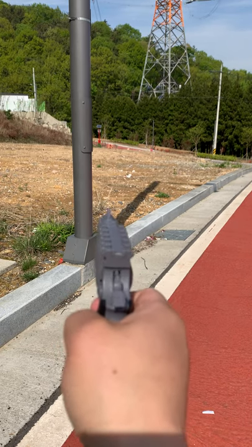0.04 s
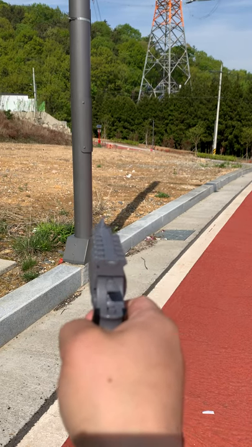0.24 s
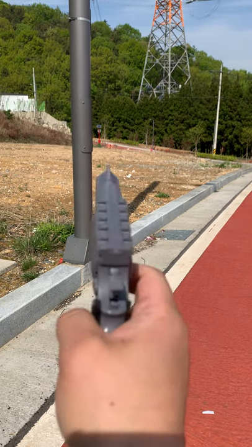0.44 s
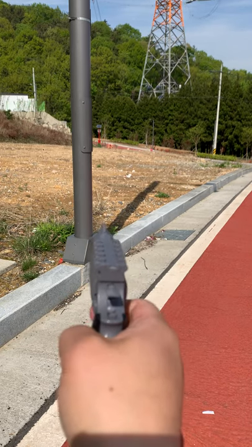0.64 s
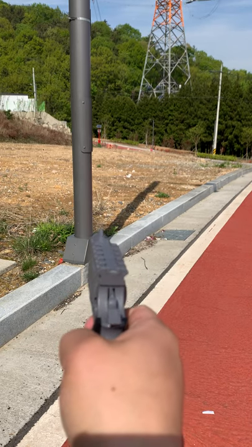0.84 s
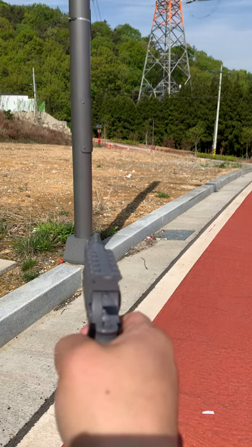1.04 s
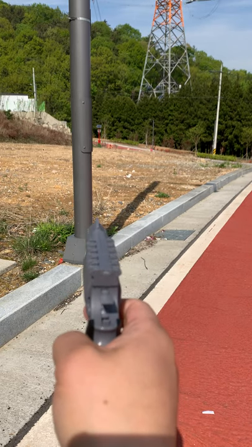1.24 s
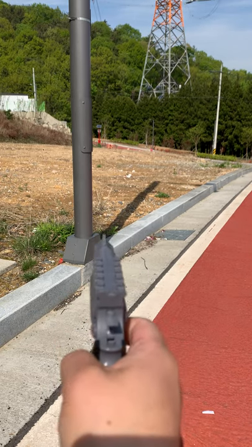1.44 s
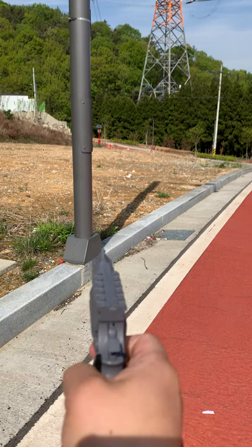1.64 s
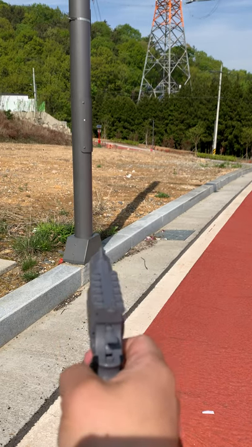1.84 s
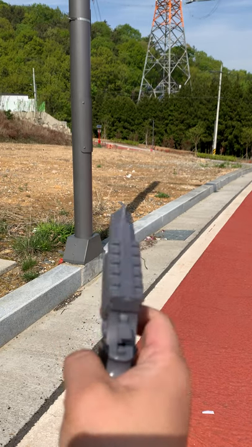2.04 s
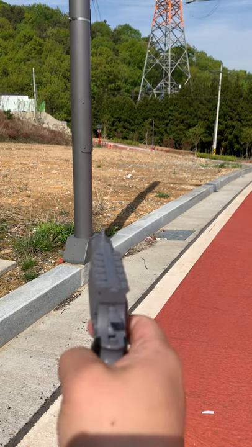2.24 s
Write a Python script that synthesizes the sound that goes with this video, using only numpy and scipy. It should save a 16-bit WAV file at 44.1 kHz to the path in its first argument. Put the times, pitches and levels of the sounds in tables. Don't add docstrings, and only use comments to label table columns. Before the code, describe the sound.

Three sharp snaps of a spring-powered toy gun outdoors, ratcheting clicks and pellet rattle in between

```python
import sys
import numpy as np
from scipy import signal
from scipy.fft import rfft, irfft
from scipy.io import wavfile
from scipy.ndimage import uniform_filter1d

SR = 44100
rng = np.random.default_rng(int(sys.argv[2]) if len(sys.argv) > 2 else 0)


def gain_from_db(level_db):
    decades = np.asarray(level_db, float) / 20
    return 10 ** decades


def put_to_file(sound):
    columns = np.atleast_2d(sound).T
    safe = np.clip(columns, -1, 1)
    whole_steps = np.round(safe * 32767)
    wavfile.write(sys.argv[1], SR, whole_steps.astype(np.int16))


N = 101430
T = np.arange(N) / SR


def unit(x):
    return x / np.sqrt(np.mean(x ** 2))


def colour(x, table):
    size = 2 ** 15
    hz, db = np.array(table, float).T
    bin_hz = np.arange(size // 2 + 1) * SR / size
    log_gain = np.interp(np.log(bin_hz + 1), np.log(hz), db) * np.log(10) / 20
    cepstrum = irfft(log_gain)
    cepstrum[1:size // 2] *= 2
    cepstrum[size // 2 + 1:] = 0
    impulse = irfft(np.exp(rfft(cepstrum)))[:size // 2]
    return signal.fftconvolve(x, impulse / np.sqrt(np.sum(impulse ** 2)))[:len(x)]


def ring(x, hz, t60_s):
    r = np.exp(-np.log(1000) / (max(t60_s, 1e-3) * SR))
    w = 2 * np.pi * hz / SR
    return signal.lfilter([np.sin(w) * np.sqrt(2 * (1 - r * r))], [1, -2 * r * np.cos(w), r * r], x)


def fade(t, t60_s, hold_s=0):
    return (t >= 0) * gain_from_db(-60 * np.maximum(t - hold_s, 0) / t60_s)


def grains(per_s, spread_db, t60_s):
    chance = rng.random((2, N))
    excess = np.minimum(-np.log(chance[1] + 1e-9), 2.5)
    knocks = (chance[0] < per_s / SR) * gain_from_db(spread_db * excess)
    return unit(signal.lfilter([1], [1, -gain_from_db(-60 / (t60_s * SR))], knocks))


def pings(x, table):
    return sum(gain_from_db(db) * ring(x * grains(130, 4, .03), hz, t60_s) for hz, db, t60_s in table)


# (time [s], level [dB], clatter hold [s], grip thump [Hz], thump level [dB])
SHOTS = [
    (0.2138, 3.5, 0.0036, 510, -10),
    (1.0621, -1, 0.0062, 650, -6.5),
    (1.8704, 1, 0.0038, 768, -7),
]
# (time [s], level [dB])
BOUNCES = [(0.2204, -16.5), (0.226, -11.5), (.233, -13), (1.0703, -3), (1.0743, -15), (1.0797, -23),
           (1.0885, -45), (1.88, 1.5), (1.8854, -28), (1.8855, -35), (1.893, -30), (1.907, -37)]
CLACK_T60_S, BOUNCE_T60_S = .018, .014
SEAR_LEAD_S, SEAR_DB, SEAR_T60_S = .0024, -31, .02
SETTLE_DB, SETTLE_T60_S = -15, .09


def piston(rebounds):
    envelope = sum(gain_from_db(db) * fade(T - s, BOUNCE_T60_S) for s, db in BOUNCES)
    for s, db, hold_s, _, _ in SHOTS:
        t = T - s
        clack = fade(t, CLACK_T60_S, hold_s)
        settle = gain_from_db(SETTLE_DB) * fade(t, SETTLE_T60_S) * (rebounds + .5)
        sear = gain_from_db(SEAR_DB) * fade(t + SEAR_LEAD_S, SEAR_T60_S)
        envelope = envelope + gain_from_db(db) * (clack + settle + sear)
    return envelope * rng.standard_normal(N)


GRIP_HZ = [320, 340, 260]
GRIP_DB = [-4, -11, -11]
GRIP_T60_S = .025


def grip():
    thump = 0
    for (s, _, _, thump_hz, thump_db), grip_hz, grip_db in zip(SHOTS, GRIP_HZ, GRIP_DB):
        t = T - s
        for hz, db in ((thump_hz, thump_db), (grip_hz, grip_db)):
            thump = thump + gain_from_db(db) * fade(t, GRIP_T60_S) * np.sin(2 * np.pi * hz * t)
    return thump


AFTER_DB, AFTER_T60_S = -32.5, 0.58


def aftershake(rebounds):
    envelope = sum(fade(T - shot[0], AFTER_T60_S) for shot in SHOTS)
    return gain_from_db(AFTER_DB) * envelope * (rebounds + .5) * rng.standard_normal(N)


PUFF_DB, PUFF_RISE_S, PUFF_FALL_S, PUFF_SWING_HZ = 1, .004, .04, 5.5


def puff():
    t = np.maximum(T - SHOTS[0][0], 0)
    push = (1 - np.exp(-t / PUFF_RISE_S)) * np.exp(-t / PUFF_FALL_S)
    return gain_from_db(PUFF_DB) * push * np.cos(2 * np.pi * PUFF_SWING_HZ * t)


# (frequency [Hz], density [dB per Hz])
CLACK = [(100, -87.5), (250, -22.5), (1010, -14.5), (2500, 1.5), (4000, -2.5), (6050, -3.5), (9000, -11.5),
         (16500, -14)]
# (frequency [Hz], level [dB], t60 [s])
SPRING = [(1600, -7, .035), (1720, -9, .025), (5950, -10, .015), (3950, -14, .012)]
# (frequency [Hz], density [dB per Hz])
RATTLE = [(350, -49.5), (700, -0.5), (1000, -20), (1610, 0), (3500, 1), (5300, 0.5), (8000, -0.5),
          (14000, -6.5)]
FRAME_DB = -29


def shots():
    rebounds = grains(1200, 2.5, .008)
    hit = piston(rebounds)
    after = aftershake(rebounds)
    impact = colour(hit, CLACK) + gain_from_db(FRAME_DB) * frame(hit)
    return impact + grip() + colour(after, RATTLE) + pings(after, SPRING) + puff()


# (frequency [Hz], level [dB], t60 [s])
FRAME = [(276, 4, 0.0084), (756, -99, 0.013), (1495, -32.5, 0.045), (1960, -2, 0.016), (2470, -4.5, 0.098),
         (2870, -3, 0.0042), (3300, -3, 0.035), (4080, 2.5, 0.005), (4330, -10, 0.0034),
         (5400, -33, 0.0067), (6534, -14, 0.012)]


def frame(x):
    gains = gain_from_db(np.array(FRAME)[:, 1])
    modes = sum(gain * ring(x, hz, t60_s) for gain, (hz, _, t60_s) in zip(gains, FRAME))
    return modes / np.sqrt(np.sum(gains ** 2))


# (time [s], peak [dB], pitch [Hz], brightness [dB])
TRIGGER = [(.131, -28, 900, 7), (.161, -18.5, 900, -4), (.168, -20, 3200, 2), (.187, -20, 2530, 3),
           (.305, -31, 1600, 8), (.344, -14.5, 1810, 3), (.393, -22, 1500, 3), (.4045, -15.5, 3300, 5),
           (.418, -18, 1940, -8), (.4308, -8, 2470, -17), (.434, -4.5, 2200, 5), (.4245, -21, 1900, 3),
           (.4385, -2, 3390, -1), (.4415, -9.5, 2200, 1), (.445, -15, 4360, 9), (1.256, -15, 6100, 10),
           (1.27, -17, 3450, -5), (1.2845, -10.5, 3070, -5), (1.291, -16, 3150, -9),
           (1.301, -16, 2480, -16), (1.305, -4, 3220, -12), (1.3088, 0.5, 2570, 9), (1.3105, -22, 1850, 31),
           (1.3145, -6.5, 3400, 12), (1.652, -29.5, 3260, -33), (1.686, -29.5, 3530, -17),
           (1.7655, -22.5, 2960, -6), (1.768, -22, 1070, -11), (1.809, -27, 3300, 6), (1.816, -27, 2800, 6),
           (1.9925, -14, 7600, 9), (2.0558, -23, 3330, -7), (2.0658, -14.5, 3400, 2),
           (2.0795, -19, 1820, -8), (2.088, -21, 1500, -7), (2.094, -15, 2000, 2), (2.0978, -5, 2320, 0),
           (2.102, -8.5, 3600, -9), (2.1046, -8, 1940, -5), (2.1058, -2.5, 12600, 12),
           (2.1085, -5, 4750, 20), (2.116, -21, 2530, -1), (2.131, -30, 4500, 6)]


def trigger():
    return clicks(TRIGGER, t60_s=0.013, trim_db=-5)


# (time [s], peak [dB], pitch [Hz], brightness [dB])
TICKS = [(.277, -8, 4430, 10), (.5, -11, 5250, 2), (.5085, -15, 5530, 0), (.5135, -15, 5330, 0),
         (.523, -16, 6000, 3), (.529, -11, 6050, 17), (.534, -9, 5640, -14), (.562, -7, 4940, 8),
         (.612, -19, 4700, -8), (.628, -15, 6200, 6), (.635, -16, 2180, 5.5), (.672, -14, 6440, -9),
         (.685, -12, 6340, 1), (.735, -18, 2500, 0), (.542, -13.5, 5500, 20), (.567, -10.5, 4760, 25),
         (.579, -12, 4680, 13), (.586, -18, 4830, 36), (.762, -11, 6700, 1), (.782, -18, 4080, -2),
         (.812, -15.5, 3430, 3), (.795, -17.5, 7000, 8), (.834, -16.5, 3150, -11), (.88, -16.5, 1980, -11),
         (.905, -23, 4780, 5), (.934, -21, 3200, 3), (.971, -21, 3080, 10), (1.002, -26, 3000, 5),
         (1.046, -45, 1540, 0), (1.1133, -20, 6400, -5), (1.1182, -15, 6060, -6), (1.1258, -12, 6100, -1),
         (1.148, -13, 5400, 9), (1.207, -12.5, 4050, 6), (1.419, -17.5, 5700, -3), (1.449, -22, 9000, -3),
         (1.472, -14, 9400, -5), (1.481, -22, 9400, -7.5), (1.52, -31, 4470, 0), (1.601, -27, 3300, -14),
         (1.909, -23, 1650, 2), (1.922, -28, 1670, -3), (1.931, -13, 5900, 11), (1.945, -25, 5880, 4),
         (1.9576, -8, 5890, 2), (2.146, -14, 12400, -16), (2.15, -30, 5530, 0), (2.1665, -23, 5440, -6),
         (2.1795, -11, 5440, 1), (2.191, -8, 6270, 3), (2.1955, -13, 4710, 8), (2.225, -9.5, 7150, 8),
         (2.2733, -9, 5400, 1)]


def pellets():
    return clicks(TICKS, t60_s=0.014, trim_db=-10.5)


# (frequency [Hz], density [dB per Hz])
CRACK = [(900, -14.5), (1700, 3), (3500, 0), (6000, 1.5), (9000, -4.5), (13000, -2.5), (16000, -17.5)]
CLICK_RISE_S, CLICK_LOW_HZ, FRAME_CLICK_DB = .0005, 800, -11
OWN_DB, OWN_T60_S = -1, .005
SOFT_HZ, SOFT_DB, DB_PER_OCTAVE = 5000, -28, 7


def clicks(table, t60_s, trim_db):
    size = 2048
    out = np.zeros(N + size)
    t = np.arange(size) / SR
    onset = np.minimum(t / CLICK_RISE_S + 0.15, 1)
    crack = rng.standard_normal((len(table), size)) * fade(t, t60_s) * onset
    wide = colour(crack.ravel(), CRACK).reshape(crack.shape)
    body = frame(crack.ravel()).reshape(crack.shape)
    for k, (s, db, hz, bright_db) in enumerate(table):
        cutoff_hz = SOFT_HZ * 2 ** ((db - SOFT_DB) / DB_PER_OCTAVE)
        pole = np.exp(-2 * np.pi * cutoff_hz / SR)
        soft = signal.lfilter([(1 - pole) ** 2], [1, -2 * pole, pole ** 2], wide[k])
        own = gain_from_db(OWN_DB) * ring(crack[k], hz, OWN_T60_S)
        click = own + gain_from_db(bright_db) * soft + gain_from_db(FRAME_CLICK_DB) * body[k]
        start = int(s * SR)
        out[start:start + size] += gain_from_db(db + trim_db) * click / np.max(np.abs(click))
    return signal.sosfilt(signal.butter(3, CLICK_LOW_HZ, "high", fs=SR, output="sos"), out[:N])


# (time [s], level [dB], hold [s], t60 [s])
SLIDES = [
    (.498, -27, .09, .3),
    (1.992, -31, .012, .15),
    (2.145, -32, .085, .15),
    (1.113, -36, .015, .15),
]
# (frequency [Hz], density [dB per Hz])
SLIDE = [(700, -32), (1600, -7), (3500, -8), (5500, -2), (7500, -3.5), (9000, -2.5), (13000, -2.5),
         (16000, -4)]
GRAIN_SPREAD_DB, GRAIN_T60_S = 3.5, .008


def slides():
    rush = sum(gain_from_db(db) * fade(T - s, t60_s, hold_s) for s, db, hold_s, t60_s in SLIDES)
    knocks = grains(1800, GRAIN_SPREAD_DB, GRAIN_T60_S) * rng.standard_normal(N)
    return colour(rush * unit(knocks), SLIDE)


GRAINS_PER_S, BRUSH_DB = 1100, -7


def shaken(shake_db):
    knocks = grains(GRAINS_PER_S / 2, GRAIN_SPREAD_DB, GRAIN_T60_S) + gain_from_db(BRUSH_DB)
    return gain_from_db(shake_db) * unit(knocks * rng.standard_normal(N))


# (time [s], level [dB])
SHAKE = [(0, -33.5), (0.062, -42), (0.111, -48.5), (.19, -42), (0.374, -44.5), (0.436, -32), (.485, -39),
         (.6, -35.5), (.72, -38), (.93, -40.5), (1.04, -53), (1.302, -36.5), (1.361, -41), (1.497, -38),
         (1.719, -49.5), (1.86, -44.5), (2.06, -36), (2.2, -36.5)]
# (frequency [Hz], density [dB per Hz])
FLECK = [(2000, -15), (6000, 2), (9000, 8), (13000, -7), (16000, -4)]
# (frequency [Hz], level [dB], t60 [s])
PELLET = [(4700, -11, .014), (5480, -11, .014), (6200, -13, .01), (8800, -13, .006), (13200, -12, .004)]
# (frequency [Hz], gain [dB])
DULL = [(500, -13.5), (1000, -14), (1600, 3.5), (4000, 3), (6500, 10), (9000, -9.5), (12000, -6),
        (16000, -37)]
SHAKE_END_DB, FLECK_DB, FRAME_RATTLE_DB = -36, -12, -13
BRIGHT_PER_DB, LOUD_SHAKE_DB = 2.06, -34


def rattle():
    s, db = np.array(SHAKE + [(N / SR, SHAKE_END_DB)]).T
    shake_db = np.interp(T, s, db)
    thin, thick = shaken(shake_db), shaken(shake_db)
    hard = gain_from_db(BRIGHT_PER_DB * (shake_db - LOUD_SHAKE_DB))
    thin = colour(thin * hard, RATTLE) + slides()
    flecks = gain_from_db(shake_db + FLECK_DB) * grains(45, GRAIN_SPREAD_DB, .012) * rng.standard_normal(N)
    held = gain_from_db(FRAME_RATTLE_DB) * colour(thick + frame(thick), DULL)
    return thin + colour(flecks, FLECK) + pings(thin, PELLET) + held


# (time [s], buffet level [dB])
GUST = [(0, -30), (.2, -30), (.36, -15.5), (.42, -19), (.66, -19), (.75, -25), (.88, -32.5), (1.1, -27),
        (1.3, -27), (1.65, -32), (1.728, -20.5), (1.898, -28.5), (2.159, -35.5), (2.263, -18), (2.3, -34)]
# (frequency [Hz], density [dB per Hz])
BUFFET = [(2, -13.5), (8, 3.5), (18, -8.5), (32, -12), (45, -22.5), (60, -12.5), (100, -85), (200, -84)]


def wind():
    s, db = np.array(GUST).T
    buffet = unit(colour(rng.standard_normal(N), BUFFET))
    buffet = buffet / np.sqrt(uniform_filter1d(buffet ** 2, size=SR // 5) + 0.042)
    return buffet * gain_from_db(np.interp(T, s, db))


HUM_WIDTH_HZ = 20.8


def hum(hz):
    t60_s = 2.75 / HUM_WIDTH_HZ
    tone = unit(ring(ring(rng.standard_normal(N), hz, t60_s), hz, t60_s))
    return unit(tone / np.sqrt(uniform_filter1d(tone ** 2, size=SR // 8) + 1.6))


# (frequency [Hz], density [dB per Hz])
AIR = [(24, -66), (40, -4.5), (87, -20), (130, -5.5), (516, -21.5), (831, -21), (6020, -53.5), (9450, -112),
       (16000, -146)]
AIR_DB = -48


def outdoors():
    traffic = gain_from_db(-42) * hum(77.3) + gain_from_db(-47) * hum(88.2)
    air = gain_from_db(AIR_DB) * unit(colour(rng.standard_normal(N), AIR))
    return wind() + traffic + air


def scene():
    gun = shots() + trigger() + pellets() + rattle()
    return (gun + outdoors())[None]


def band_limit(x):
    return signal.sosfilt(signal.butter(12, 17110, fs=SR, output="sos"), x)


CEILING, KNEE, TOP_HZ = .62, 4, 15900


def record(dry):
    x = dry / (1 + np.abs(dry / CEILING) ** KNEE) ** (1 / KNEE)
    x = signal.sosfiltfilt(signal.ellip(6, .1, 25, TOP_HZ, fs=SR, output="sos"), x)
    return band_limit(x)


dry = scene()
out = record(dry)
put_to_file(out)
```